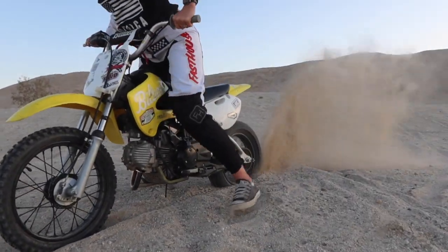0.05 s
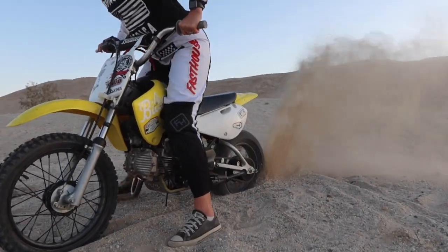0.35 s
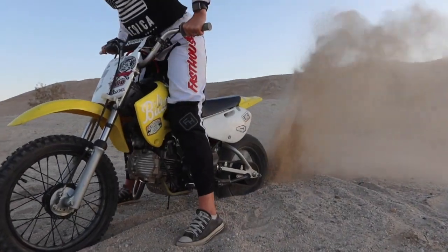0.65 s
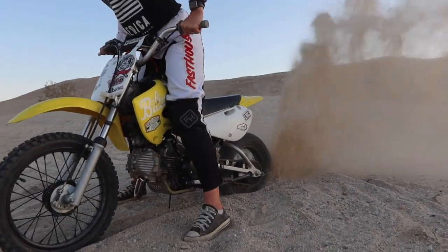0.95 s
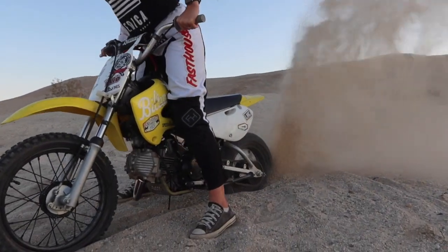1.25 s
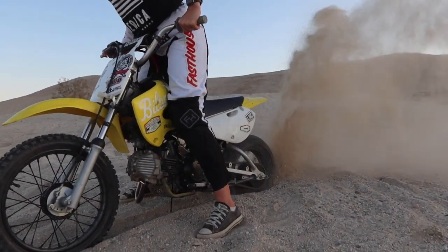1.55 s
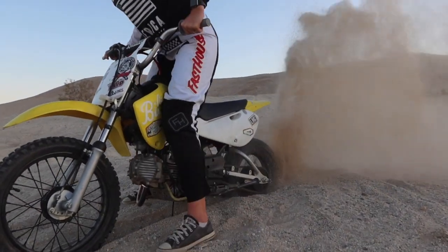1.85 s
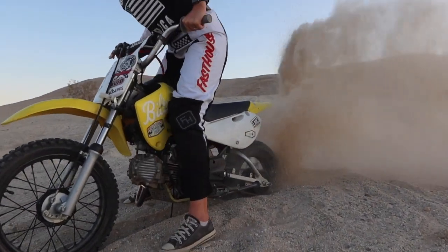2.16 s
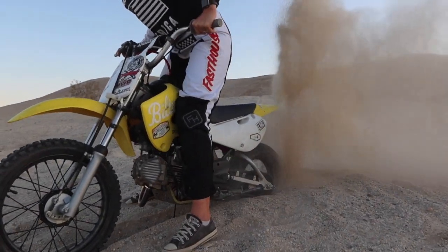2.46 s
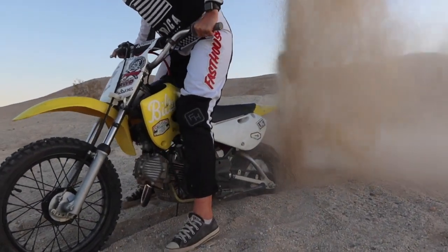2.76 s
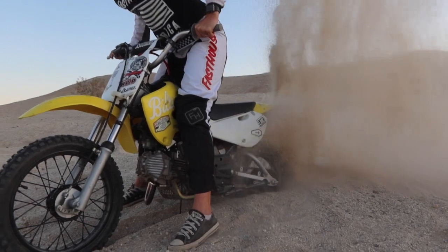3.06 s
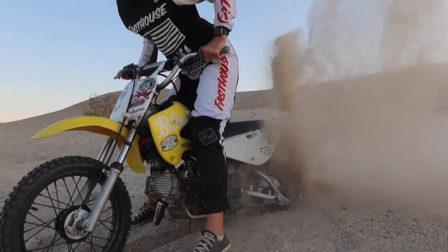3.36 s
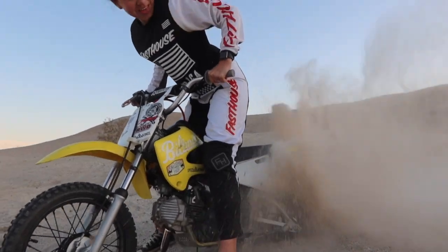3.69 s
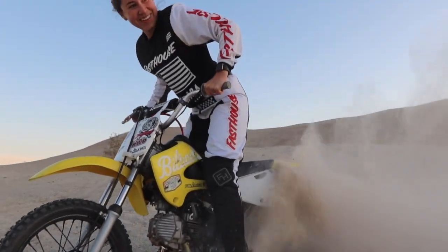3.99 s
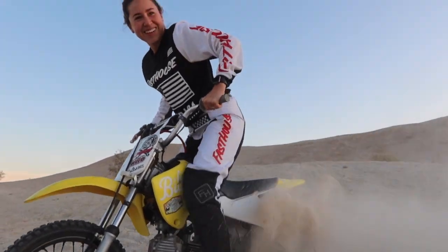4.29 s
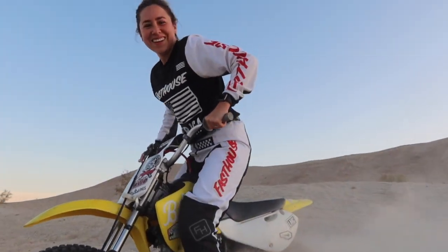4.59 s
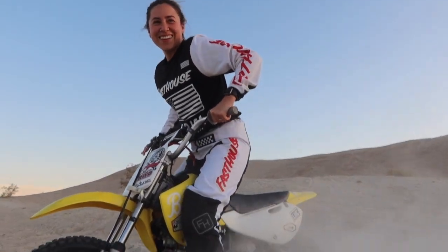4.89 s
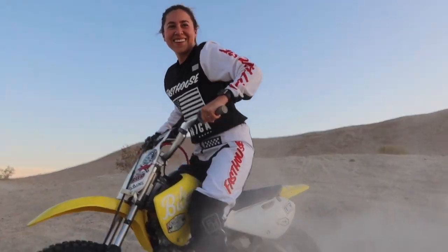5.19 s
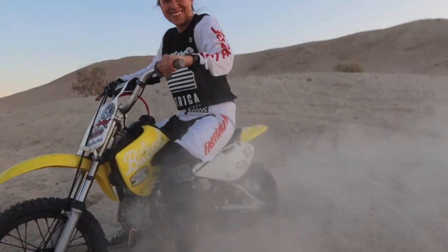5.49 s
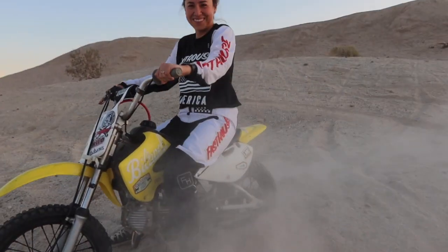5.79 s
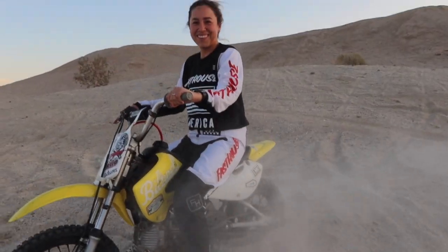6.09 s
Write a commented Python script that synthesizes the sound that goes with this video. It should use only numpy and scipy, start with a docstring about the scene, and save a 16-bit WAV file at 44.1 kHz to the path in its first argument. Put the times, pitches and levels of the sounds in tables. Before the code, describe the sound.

In open desert without echo, a small four-stroke dirt bike barks and growls a couple of metres from the microphone. The pitch wavers as the rear wheel spins and throws a gusty spray of sand. Then the throttle closes and the revs fall, with soft exhaust pops and a few chain slaps. The engine ends on a slow, pulsing idle with light metallic ticks, growing slightly louder.

```python
"""A small single-cylinder four-stroke dirt bike is held on the throttle, its rear wheel spinning in sand.
Each firing thumps, barks and rasps through the silencer; the intake honks, gears and chain rattle
and sand sprays from the tyre. The throttle shuts, the exhaust pops a few times and the engine
settles to a putting idle with ticking valves. Open desert, no echo, a couple of metres away."""
import sys
import numpy as np
from scipy import signal
from scipy.fft import rfft, irfft
from scipy.io import wavfile
from scipy.ndimage import uniform_filter1d

SR = 44100
rng = np.random.default_rng(int(sys.argv[2]) if len(sys.argv) > 2 else 0)


def transcribe(u):
    """Save the signal u as a 16-bit wav file named by the first command-line argument.

    u: samples, shape (n,) or (channels, n), limited to [-1, 1]; the rate is SR.
    q: integer samples, one column per channel.
    """
    v = np.clip(np.atleast_2d(u).T, -1, 1)
    q = np.round(v * 32767).astype(np.int16)
    wavfile.write(sys.argv[1], SR, q)


N = 270774
TIME = np.arange(N) / SR


def undb(db):
    """Decibels to gain."""
    return 10 ** (np.asarray(db) / 20)


def curve(table, t):
    """Rows of (t/s, value) joined by straight lines."""
    return np.interp(t, *np.transpose(table))


def unit_rms(x):
    """Scale to rms 1."""
    return x / np.sqrt(np.mean(x ** 2))


def noise():
    """White noise."""
    return rng.standard_normal(N)


def grains(spread_db, size=1):
    """Noise of tiny unequal impacts, each size samples long."""
    strength = np.minimum(rng.exponential(size=N // size + 1), 3.5)
    return unit_rms(noise() * undb(spread_db * strength).repeat(size)[:N])


def scatter(times, spread_db):
    """A random gain per event."""
    return undb(spread_db * rng.standard_normal(len(times)))


def pulses(times, sizes):
    """Impulses, each split between two adjacent samples."""
    place = np.clip(times * SR, 0, N)
    index, frac = place.astype(int), place % 1
    return (np.bincount(index, sizes * (1 - frac), N + 2) + np.bincount(index + 1, sizes * frac, N + 2))[:N]


def burst(rise_s, fall_s, size=4096):
    """Puff envelope, peak 1."""
    t = TIME[:size]
    shape = (1 - np.exp(-t / rise_s)) ** 2 * np.exp(-t / fall_s)
    return shape / shape.max()


def response(spectrum, size=8192):
    """Minimum-phase impulse response of unit energy from rows of (f/Hz, level/dB)."""
    hz, db = np.transpose(spectrum)
    f = np.maximum(np.arange(size // 2 + 1) * SR / size, 1)
    skirts = np.minimum(f / hz[0], 1) * np.minimum(hz[-1] / f, 1) ** 2
    magnitude = undb(np.interp(np.log(f), np.log(hz), db)) * skirts
    cepstrum = irfft(np.log(magnitude))
    cepstrum[1:size // 2] *= 2
    cepstrum[size // 2 + 1:] = 0
    impulse = irfft(np.exp(rfft(cepstrum)))
    return impulse / np.linalg.norm(impulse)


def ring(x, impulse):
    """Convolve with an impulse response."""
    return signal.oaconvolve(x, impulse)[:N]


def resonance(x, hz, width_hz):
    """One resonance, gain 1 at its centre."""
    return signal.lfilter(*signal.iirpeak(hz, hz / width_hz, fs=SR), x)


def clang(x, ring_db, decay_s, size=2048):
    """Thin metal adds a short, dense ring."""
    tail = rng.standard_normal(size) * np.exp(-TIME[:size] / decay_s)
    ringing = ring(x, tail / np.linalg.norm(tail))
    return (x + undb(ring_db) * ringing) / np.hypot(1, undb(ring_db))


def disperse(x, corner_hz):
    """All-pass: the long pipe lets bass out later than treble."""
    warped = np.tan(np.pi * corner_hz / SR)
    coeff = (warped - 1) / (warped + 1)
    return signal.lfilter([coeff, 1], [1, coeff], x)


# firing rate on the throttle: t/s, f/Hz
FIRING_RATE = [(0.0, 56.69), (0.48, 64.49), (0.75, 62.82), (1.6, 51.63), (1.85, 49.78), (2.5, 58.04),
               (3.2, 63.59), (3.8, 62.44)]
RUN_DOWN_AT_S, RUN_DOWN_S, IDLE_HZ = 3.758, 1.196, 17.544


def firing_hz(t):
    """Engine speed: held by the rider, then an S-curve down to idle."""
    progress = np.clip((t - RUN_DOWN_AT_S) / RUN_DOWN_S, 0, 1)
    return IDLE_HZ + (curve(FIRING_RATE, t) - IDLE_HZ) * np.cos(np.pi / 2 * progress) ** 2


def cycle_times(cycles, phase):
    """Times at which the engine passes a phase (0-1) of its cycle."""
    crossings = np.arange(np.floor(cycles[0] - phase), cycles[-1] - phase) + phase
    return np.interp(crossings, cycles, TIME)


def spacing_gain(t):
    """Keeps a pulse train's mean power independent of firing rate."""
    return np.sqrt(SR / firing_hz(t))


# twist grip, two bursts then shut: t/s, opening/0-1
GRIP = [(0, 0.96), (.46, 0.85), (.62, 0.57), (1.1, 0.54), (1.65, 0.61), (1.95, 0.78), (2.4, 0.78),
        (3.05, 0.72), (3.35, 0.53), (3.8, 0.5), (4.0, 0.2), (4.3, 0.05)]
SHUT_S = 4.3


def throttle(t):
    """Throttle opening; the idle screw keeps it from closing fully."""
    return np.clip(curve(GRIP, t), .02, 1)


DIG_S, DIG_RAMP_S, WHEEL_STOP_S, STOP_RAMP_S = 2.14, 0.4, 5.02, 0.096


def dug_in(t):
    """1 while the spinning wheel is buried in sand, 0 before and after."""
    buried = np.clip(.5 + (t - DIG_S) / DIG_RAMP_S, 0, 1)
    spinning = np.clip(.5 + (WHEEL_STOP_S - t) / STOP_RAMP_S, 0, 1)
    return buried * spinning


WORKING_HZ = 60


def drive(law_db, t):
    """Gain from a law in dB: (base, per doubling of speed, per doubling of throttle, wheel dug in)."""
    base_db, speed_db, throttle_db, dug_db = law_db
    octaves = np.log2(firing_hz(t) / WORKING_HZ)
    return undb(base_db + speed_db * octaves + throttle_db * np.log2(throttle(t)) + dug_db * dug_in(t))


# spray spectrum: f/Hz, level/dB
SPRAY_SPECTRUM = [(300, -12.5), (1000, 8), (2000, -0.5), (3400, 1), (4600, -4), (6500, -12.5), (10000, -19),
                  (15000, -20.5)]
# stone hits: t/s, level/dB
STONE_HITS = [(4.424, -31), (4.487, -33)]
SAND_LAW_DB = (-36, 12, 4, -0.5)


def sand():
    """Grains leave the tyre in uneven gusts; stones click on the frame."""
    drift = uniform_filter1d(uniform_filter1d(noise(), size=1500), size=1500)
    gusts = undb(1.5 * unit_rms(drift))
    spray = ring(drive(SAND_LAW_DB, TIME) * gusts * grains(spread_db=4.7), response(SPRAY_SPECTRUM))
    times, db = np.transpose(STONE_HITS)
    hits = ring(pulses(times, undb(db)), burst(.0001, 0.00093)) * noise()
    clicks = ring(hits, response([(2000, 0), (5000, 1), (14000, -18)]))
    return spray + undb(-3) * clicks


# chain guard spectrum: f/Hz, level/dB
GUARD_SPECTRUM = [(80, 2), (300, 5.5), (420, -25), (570, 8.5), (700, 7.5), (890, 4.5), (1060, -12),
                  (1280, 1), (1470, -0.5), (1660, -8), (1990, -1.5), (2300, -14), (4400, -16.5),
                  (9000, -32.5)]
# chain slaps: t/s, level/dB, decay/s
CHAIN_SLAPS = [(4.408, -17.5, 0.015), (4.552, -24.5, 0.092), (4.631, -43, 0.038), (4.773, -19, 0.0041)]
CHAIN_LAW_DB = (-40, 4, 1.5, 9.5)


def chain():
    """The chain rushes through its guard and slaps as it goes slack."""
    rush = drive(CHAIN_LAW_DB, TIME) * ring(noise(), response(GUARD_SPECTRUM))
    envelope = sum(undb(db) * (TIME > t) * np.exp(-np.abs(TIME - t) / decay_s)
                   for t, db, decay_s in CHAIN_SLAPS)
    slap_body = response([(350, -25), (600, -2), (800, 2.5), (1050, -14), (3000, -22)])
    return rush + undb(-13) * ring(envelope * noise(), slap_body)


# engine case spectrum: f/Hz, level/dB
CASE_SPECTRUM = [(50, -6), (130, 1), (300, 8), (400, 6.5), (520, -3.5), (750, 0.5), (1100, -9.5),
                 (1400, -20), (1700, -13.5), (3000, -16.5), (4400, -21.5), (7000, -38), (10000, -41.5),
                 (15000, -51)]
# engine case modes: f/Hz, width/Hz, level/dB
CASE_RESONANCES = [(1019, 77, 15), (1230, 49, 17), (1860, 35, -31), (2550, 48, 1), (3184, 65, 7)]
GEAR_LAW_DB, KNOCK_LAW_DB = (-34.5, 7, 0, -.5), (10.5, -2, 4, -5.5)


def crankcase(cycles):
    """Gear teeth clatter in the cases; the piston knocks on them once a cycle."""
    rattle = grains(spread_db=2.2, size=64) * (1 + 0.045 * np.cos(4 * np.pi * cycles))
    t = cycle_times(cycles, phase=.15)
    knocks = pulses(t, drive(KNOCK_LAW_DB, t) * spacing_gain(t) * scatter(t, 1.5))
    impacts = undb(8.5) * rattle + knocks
    modes = sum(undb(db) * resonance(impacts, hz, width) for hz, width, db in CASE_RESONANCES)
    clatter = ring(clang(rattle, ring_db=0, decay_s=0.021), response(CASE_SPECTRUM))
    return drive(GEAR_LAW_DB, TIME) * (clatter + undb(-4.5) * unit_rms(modes))


# valve closings: phase/cycles after firing, level/dB
VALVE_CLOSINGS = [(.315, -9), (0.572, -5)]
# valve gear modes: f/Hz, width/Hz, level/dB
VALVE_MODES = [(3340, 150, -5), (3850, 400, -1), (5040, 190, -3), (5430, 94, 9), (5840, 43, 0)]
VALVE_LAW_DB = (-20, -1.5, 0.5, -4)


def valves(cycles):
    """Each closing valve rings the valve gear."""
    ticks = np.zeros(N)
    for phase, tap_db in VALVE_CLOSINGS:
        t = cycle_times(cycles, phase)
        taps = pulses(t, undb(tap_db) * drive(VALVE_LAW_DB, t) * scatter(t, 2.0))
        ticks += sum(undb(db) * resonance(taps, hz, width) for hz, width, db in VALVE_MODES)
    return ticks


INTAKE_LAW_DB = (-16.5, 36, 2.5, 5.5)


def intake(firings):
    """Later in each cycle the open carburettor gulps air and the airbox honks, most at high speed."""
    t = firings[firings < SHUT_S]
    sizes = drive(INTAKE_LAW_DB, t) * spacing_gain(t) * scatter(t, 2.0)
    gulps = pulses(t + .58 / firing_hz(t), sizes)
    return resonance(resonance(gulps, hz=1367, width_hz=132), hz=1480, width_hz=147)


# idle firing spectrum: f/Hz, level/dB
PUTT_SPECTRUM = [(30, -12), (52, -45), (72, 3.5), (95, 6), (120, 3.5), (160, 2), (187, -10), (225, -3),
                 (300, -8.5), (350, -14), (390, -50), (460, -18.5), (720, -27.5), (1000, -55)]
# pop spectrum: f/Hz, level/dB
POP_SPECTRUM = [(40, -49), (90, 2.5), (150, 4.5), (230, 1.5), (310, -6), (400, -22), (700, -21),
                (1500, -56)]
# pops in the pipe: t/s, level/dB
FUEL_POPS = [(4.31, -10.5), (4.3343, -10.5), (4.3593, -11.5), (4.3844, -11.5), (4.44, -10), (4.4685, -11),
             (4.5317, -14)]
PUTT_LAW_DB = (-27.5, -0.5, 0, -2.5)


def idle(firings):
    """Throttle shut: soft, uneven firings ring the silencer; unburnt fuel pops in the pipe."""
    t = firings[firings >= SHUT_S]
    sizes = drive(PUTT_LAW_DB, t) * spacing_gain(t) * scatter(t, 0.66)
    silencer = response(PUTT_SPECTRUM)
    putts = ring(pulses(t + 0.00023, sizes), silencer)
    uneven_burn = ring(pulses(t, sizes), burst(0.0054, 0.015)) * noise()
    flutter = ring(uneven_burn, silencer)
    times, db = np.transpose(FUEL_POPS)
    pop = response(POP_SPECTRUM)
    pops = ring(pulses(times, undb(db)), pop / np.abs(pop).max())
    return disperse(putts + undb(-36) * flutter + pops, corner_hz=190)


COOL_PITCH, HEAT_RISE, HEAT_LAG_S, DUG_LOAD = 0.853, 0.15, 0.31, 0.97


def heat_factor(t):
    """Silencer pitch factor: engine power warms the gas, and hot gas carries sound faster."""
    power = throttle(TIME) * firing_hz(TIME) / WORKING_HZ * (1 + DUG_LOAD * dug_in(TIME))
    step = 1 / (HEAT_LAG_S * SR)
    warmth = power[0] + signal.lfilter([step], [1, step - 1], power - power[0])
    return COOL_PITCH + HEAT_RISE * np.interp(t, TIME, warmth)


# silencer gas cross modes at heat factor 1: f/Hz, width/Hz, level/dB
CROSS_MODES = [(998, 120, -9), (1400, 110, -3.5), (1765, 56, 4), (2015, 266, 5), (2060, 520, -4.5),
               (3020, 570, -17)]


def silencer_ring(times, sizes):
    """Each pressure front rings the cross modes, higher as the gas heats up."""
    age = TIME[:768] * heat_factor(times)[:, None]
    waves = np.zeros_like(age)
    for k, (hz, width, db) in enumerate(CROSS_MODES):
        envelope = undb(db) * width / SR * np.exp(-np.pi * width * age)
        waves += (-1) ** k * envelope * np.sin(2 * np.pi * hz * age)
    place = (times * SR).astype(int)[:, None] + np.arange(age.shape[1])
    return np.bincount(place.ravel(), (sizes[:, None] * waves).ravel(), N)[:N]


# low blow-down spectrum: f/Hz, level/dB
THUMP_SPECTRUM = [(35, -38), (60, -8), (100, 2), (122, 5.5), (165, -3), (190, 0), (215, -11.5), (255, -6.5),
                  (310, -7.5), (360, -13), (400, -29), (800, -60.5)]
# mid blow-down spectrum: f/Hz, level/dB
BARK_SPECTRUM = [(300, -33.5), (400, -26.5), (455, -3), (520, 3), (565, 3.5), (625, -4), (700, -0.5),
                 (810, -8.5), (930, -26), (1300, -16.5), (1620, -51), (2700, -28.5), (5000, -81.5)]
# turbulent gas spectrum: f/Hz, level/dB
RASP_SPECTRUM = [(100, -6.5), (350, 0), (560, -22.5), (800, -12), (1000, -39), (1600, -2.5), (2000, 3),
                 (2600, -2.5), (3400, -3), (5000, -10), (7000, -15.5), (10000, -22), (15000, -29.5)]
THUMP_LAW_DB, RASP_LAW_DB = (-15, -6.5, 2.5, 1.18), (-25, 7.5, 13, 1)
BARK_LAW_DB, GROWL_LAW_DB = (-21, 2, 3.5, 2), (-11, -7, 1, 4)  # growl relative to bark
RING_LAW_DB = (2.5, 16, 12, 1.5)


def exhaust(firings):
    """Under load each blow-down thumps, barks and rings the silencer; a turbulent puff follows."""
    t = firings[firings < SHUT_S]
    t = t + .00002 * rng.standard_normal(len(t))
    spacing = spacing_gain(t)
    bark_sizes = drive(BARK_LAW_DB, t) * scatter(t, 0.16)
    gas_sizes = drive(RASP_LAW_DB, t) * scatter(t, 0.36)
    thump_sizes = drive(THUMP_LAW_DB, t) * spacing * scatter(t, 0.37)
    thump = disperse(ring(pulses(t, thump_sizes), response(THUMP_SPECTRUM)), corner_hz=314)
    # under strain the pressure front breaks up into a growl
    growl = ring(pulses(t, bark_sizes * drive(GROWL_LAW_DB, t)), burst(0.0005, 0.012)) * noise()
    bark = -ring(pulses(t, bark_sizes * spacing) + growl, response(BARK_SPECTRUM))
    ring_sizes = drive(RING_LAW_DB, t) * spacing * scatter(t, 0.98)
    ringing = silencer_ring(np.maximum(t - .0013, 0), ring_sizes)
    jet = ring(pulses(t + 0.00051, gas_sizes), burst(0.00055, 0.0013)) * noise()
    rasp = ring(clang(jet, ring_db=-11.5, decay_s=0.015), response(RASP_SPECTRUM))
    return thump + bark + ringing + undb(7) * rasp


SWELL_DB_PER_S = 4.5


def scene():
    """One crankshaft times the engine, straight ahead; the sound swells once the wheel stops."""
    cycles = .083 + np.cumsum(firing_hz(TIME)) / SR
    firings = cycle_times(cycles, phase=0)
    engine = exhaust(firings) + intake(firings) + idle(firings) + crankcase(cycles) + valves(cycles)
    swell = undb(SWELL_DB_PER_S * np.maximum(TIME - WHEEL_STOP_S, 0))
    bike = (engine + chain() + sand()) * swell
    return np.array([bike, bike])


# side signal of the two microphone ports: f/Hz, level/dB
SIDE_SPECTRUM = [(60, -69), (250, -35), (1000, -12.5), (4000, -2.5), (12000, 15.5), (20000, 14)]
LOWPASS_HZ = 15550


def record(dry):
    """The microphone housing scatters treble unequally to its two ports; the top is cut."""
    side = undb(-10.5) * ring(clang(dry[0], ring_db=37, decay_s=0.02), response(SIDE_SPECTRUM))
    lowpass = signal.ellip(10, .2, 80, LOWPASS_HZ, fs=SR, output="sos")
    return signal.sosfilt(lowpass, dry + np.array([side, -side]))


dry = scene()
out = record(dry)
transcribe(out)
```